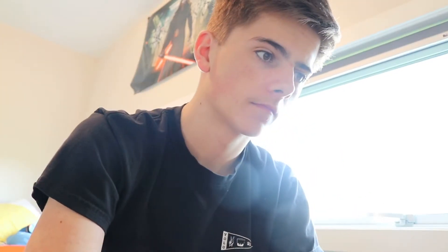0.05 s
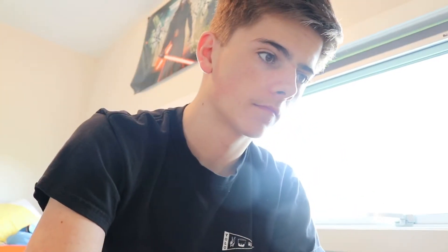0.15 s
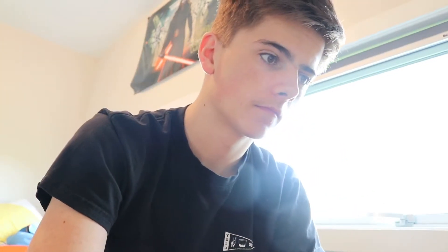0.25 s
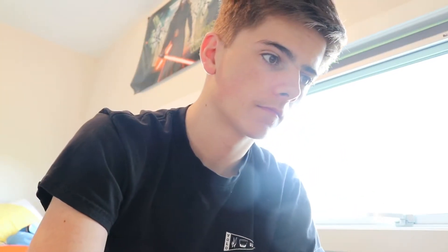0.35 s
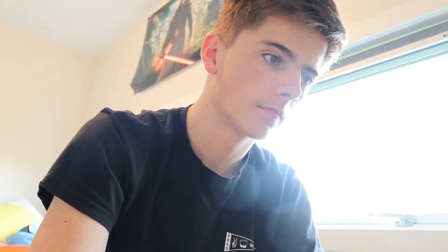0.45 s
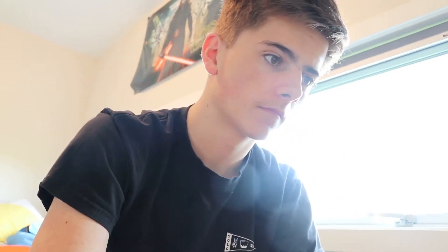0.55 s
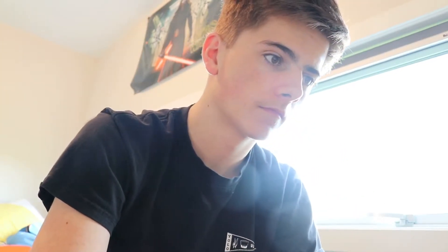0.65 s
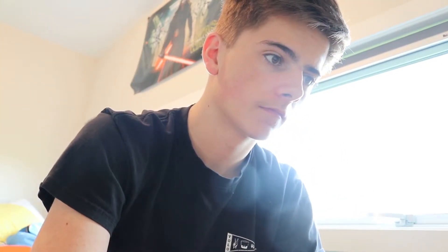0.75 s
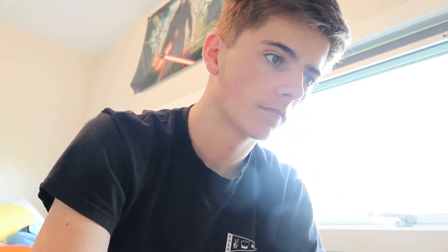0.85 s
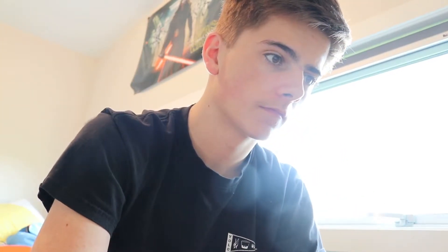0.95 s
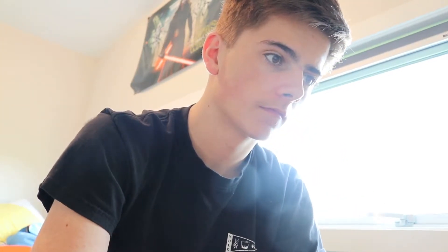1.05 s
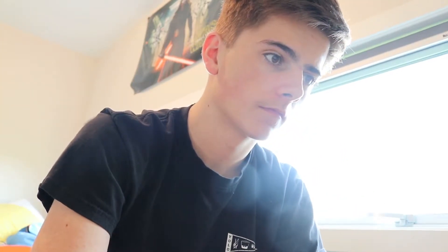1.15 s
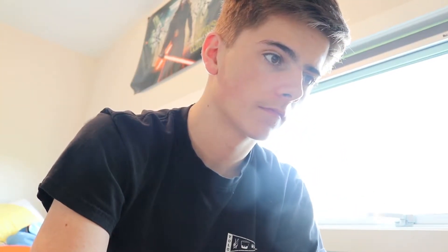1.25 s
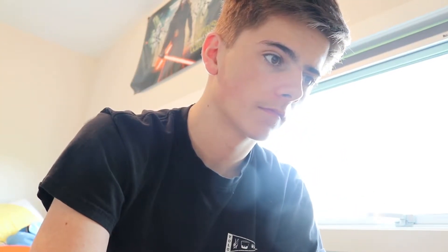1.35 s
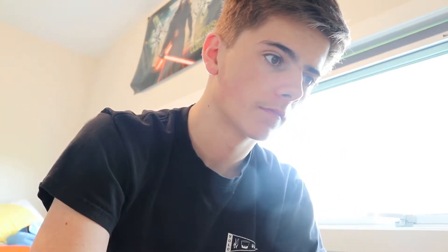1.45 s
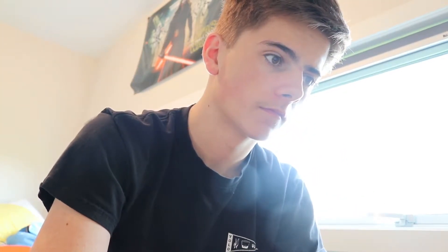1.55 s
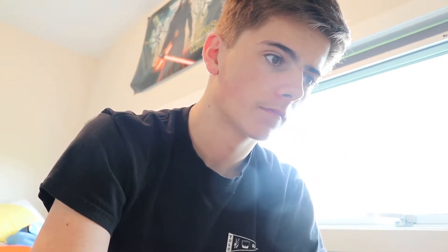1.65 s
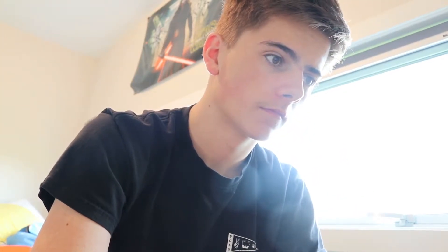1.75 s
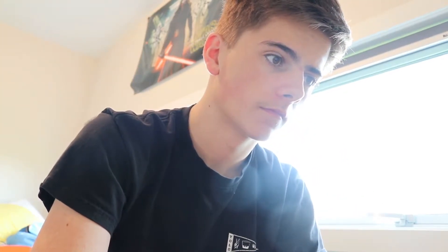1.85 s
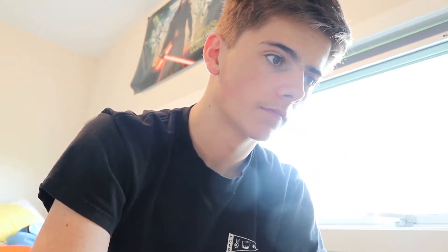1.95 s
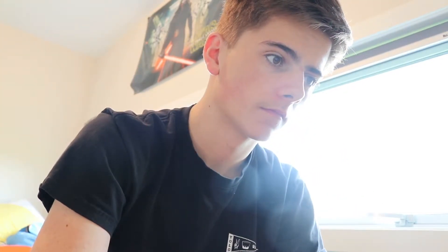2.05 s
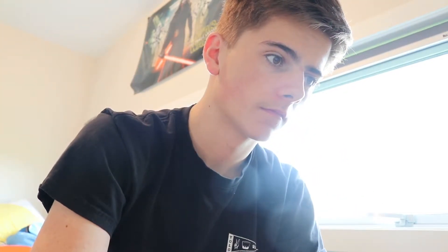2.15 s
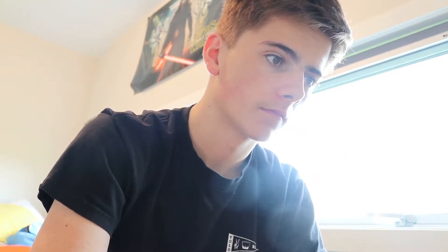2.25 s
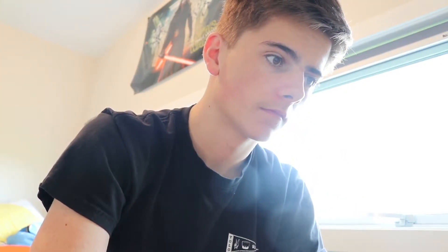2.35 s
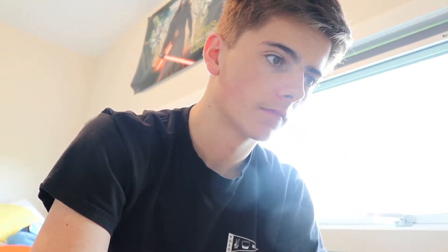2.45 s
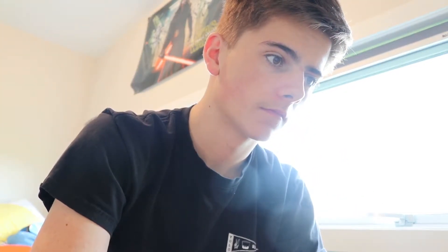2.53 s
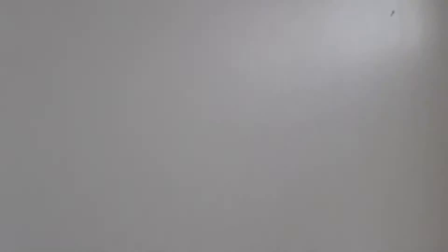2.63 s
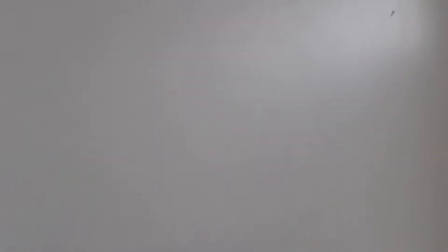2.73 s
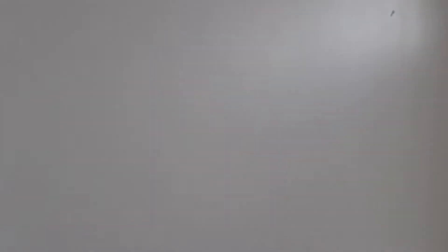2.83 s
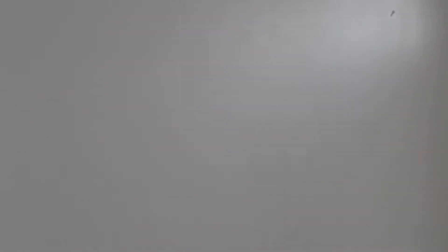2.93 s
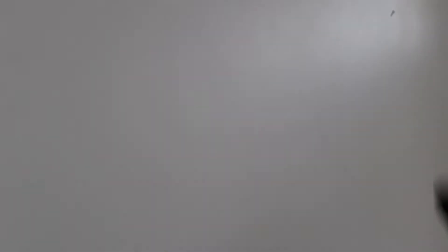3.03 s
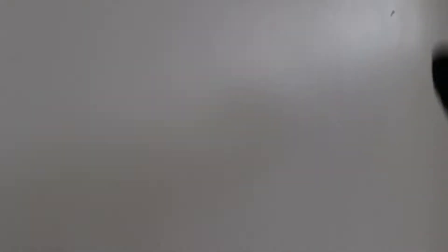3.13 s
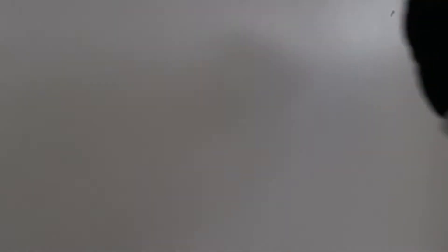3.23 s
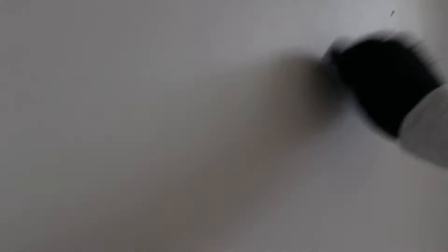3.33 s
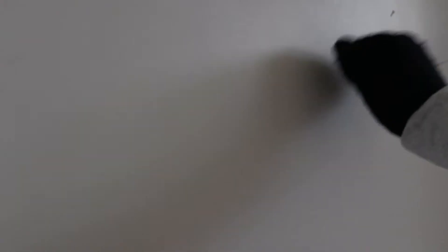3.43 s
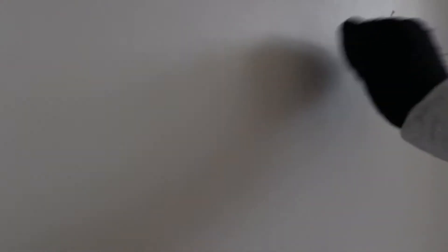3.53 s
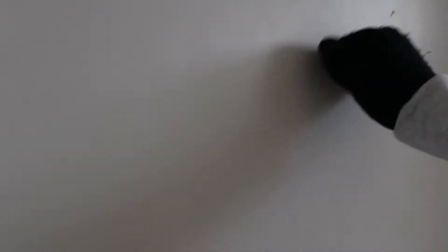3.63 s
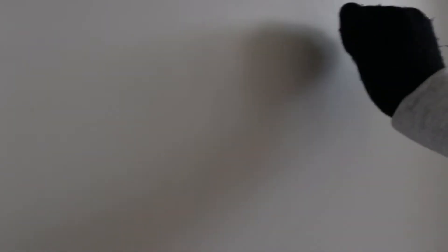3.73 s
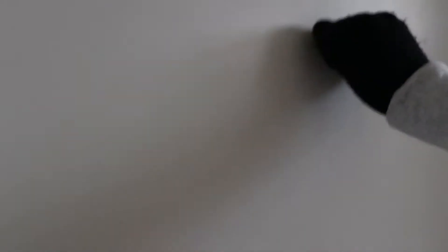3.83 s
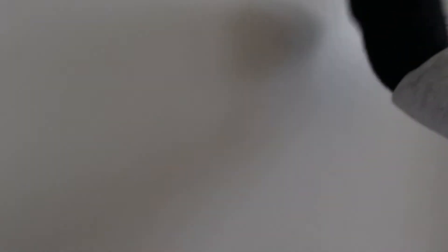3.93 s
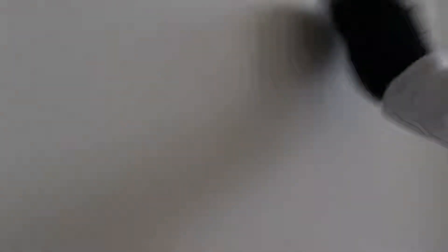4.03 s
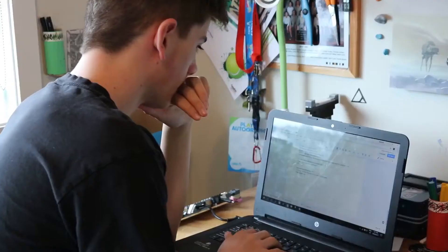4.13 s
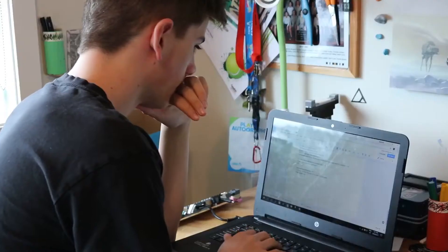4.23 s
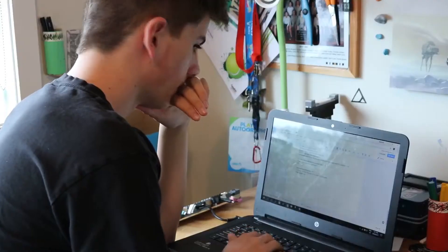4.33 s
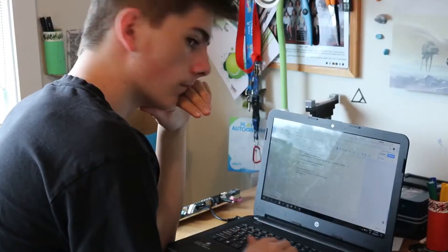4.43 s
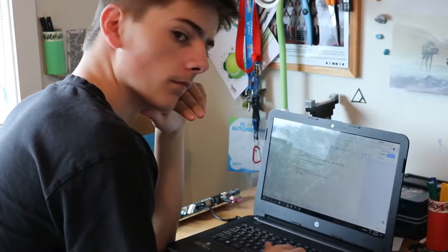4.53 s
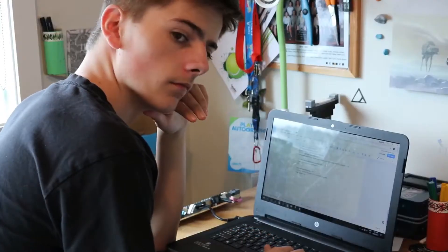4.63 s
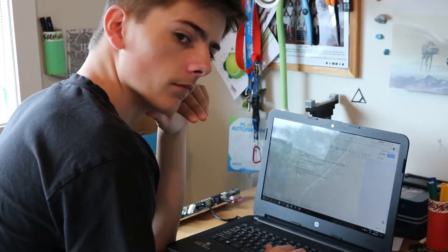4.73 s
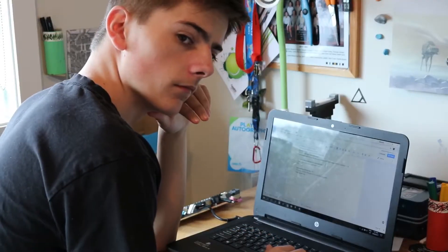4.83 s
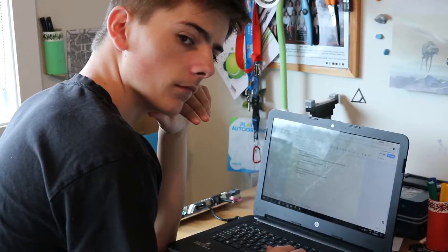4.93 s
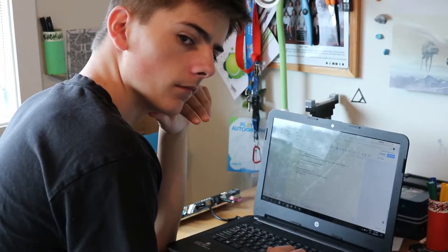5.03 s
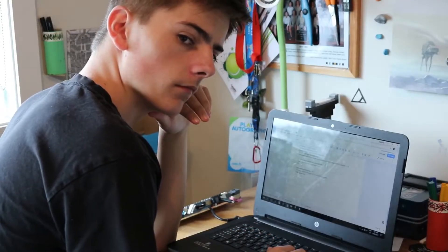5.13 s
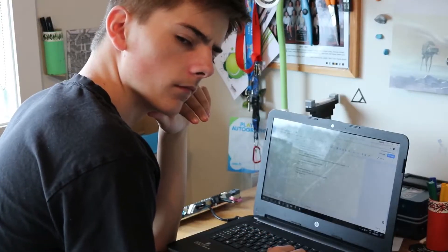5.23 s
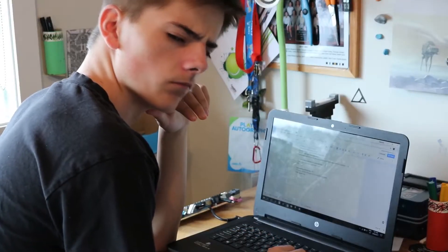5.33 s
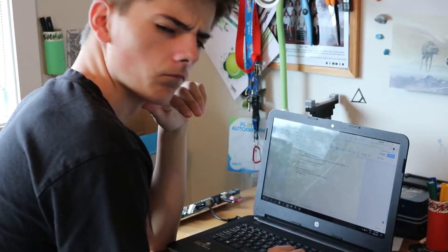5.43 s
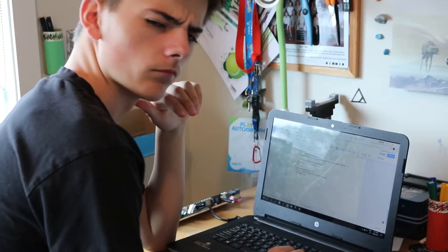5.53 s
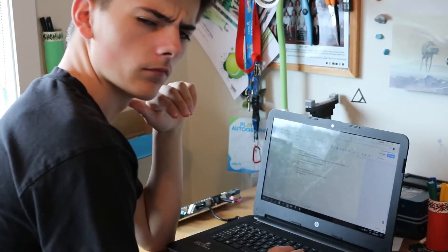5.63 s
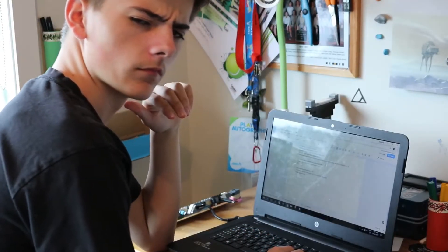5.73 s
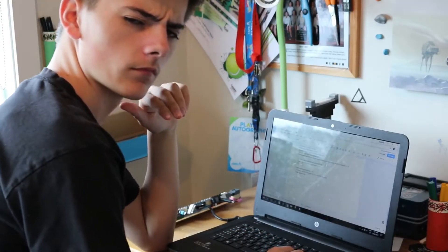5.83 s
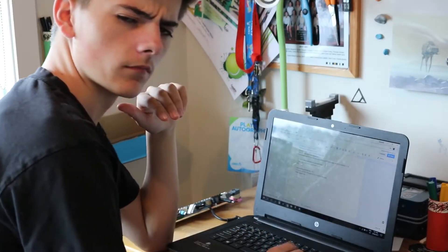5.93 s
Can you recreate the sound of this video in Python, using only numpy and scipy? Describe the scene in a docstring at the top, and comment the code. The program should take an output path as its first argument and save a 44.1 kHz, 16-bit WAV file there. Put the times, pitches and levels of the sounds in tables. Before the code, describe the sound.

Light laptop typing in a quiet room, then four loud, echoing knocks on a hollow wooden door.

```python
"""Fingers type lightly on a laptop, right of a pair of microphones in a small quiet room.
Key caps snap and rattle, and the landing fingers thump the laptop shell and the desk under it.
Four knuckle blows ring a hollow wooden door, which buzzes in its frame and echoes in a hall.
Cloth swishes faintly; then the door's echo cuts off and the room hiss drops a little."""
import sys
import numpy as np
from scipy import signal
from scipy.fft import rfft, irfft
from scipy.io import wavfile
from scipy.ndimage import uniform_filter1d

SR = 44100
rng = np.random.default_rng(int(sys.argv[2]) if len(sys.argv) > 2 else 0)


def dump_mix(stems):
    """Bounce the given channels to the path in sys.argv[1] as a 16-bit WAV at rate SR."""
    frames = np.atleast_2d(stems).T  # one column per channel
    limited = np.clip(frames, -1, 1)  # hard clip at full scale
    pcm = np.round(limited * 32767).astype(np.int16)
    wavfile.write(sys.argv[1], SR, pcm)


N = 263718

# reverb time of the small room around the desk: f/Hz, t60/s
ROOM_DECAY = [(100, 0.2), (500, 0.22), (2000, 0.34), (6000, 0.26), (14000, 0.21)]
# stereo image of the thump and knock echoes, centred in the bass: f/Hz, left-right correlation
ECHO_IMAGE = [(60, .998), (130, .997), (290, .87), (640, .7), (1400, .25), (3000, .05)]
# stereo image of the room tone and the key snap echoes: f/Hz, left-right correlation
AIR_IMAGE = [(60, 0.78), (240, 0.62), (950, 0.74), (3770, 0.0065), (15000, 0.02)]
CUT_S = 4.537  # the door's echo stops and the hiss drops
PUSH_PEAK_S = 0.003  # a blow's force peaks this far into its sound
LEFT_LAG_SAMPLES = 7  # the laptop reaches the left microphone late


def amp(db):
    return 10 ** (np.asarray(db) / 20)


def unit_rms(x):
    return x / np.sqrt(np.mean(x ** 2) + 1e-20)


def curve_at(points, hz):
    """Read a breakpoint curve along a log frequency axis."""
    f, value = np.transpose(points)
    return np.interp(np.log(hz + 1), np.log(f + 1), value)


def add(mix, start_s, sound):
    part = mix[..., round(start_s * SR):][..., :sound.shape[-1]]
    part += sound[..., :part.shape[-1]]


def band_noise(edges_hz, shape):
    white = rng.standard_normal(shape)
    return unit_rms(signal.lfilter(*signal.butter(2, edges_hz, "band", fs=SR), white))


def stereo_noise(spectrogram_db, correlation, size):
    """Noise shaped by a spectrogram (bins x frames), with a left-right correlation per bin."""
    a, b, c, d = rng.standard_normal(spectrogram_db.shape[::-1] + (4,)).T
    correlation = np.clip(correlation, 0, 1)[:, None]
    left = a + 1j * b
    right = correlation * left + np.sqrt(1 - correlation ** 2) * (c + 1j * d)
    spectra = np.array([left, right]) * amp(spectrogram_db)
    return signal.istft(spectra, nperseg=size, noverlap=size * 3 // 4)[1]


def reverb(x, decays, image, predelay_s, size):
    """A dense tail that starts with the first wall; each band dies at its own speed."""
    hz, t = np.fft.rfftfreq(size, 1 / SR), np.arange(4 * SR // size) * size / 4 / SR
    tail = stereo_noise(-60 * t / curve_at(decays, hz)[:, None], curve_at(image, hz), size)
    tail *= np.arange(tail.shape[1]) > predelay_s * SR
    return signal.fftconvolve(x[None], tail / np.linalg.norm(tail[0]), axes=1)[:, :N]


def strike(modes, db, contact_ms, drive, phase_lag, swell_cycles):
    """A rounded push sets off modes that swell and ring out; longer contact sounds duller."""
    hz, mode_db, t60 = np.transpose(modes)[:, :, None]
    t = np.arange(SR // 2) / SR
    swell = 1 - np.exp(-(t + 1 / SR) * hz / swell_cycles)
    decay = amp(mode_db + curve_at(drive, hz) - 60 * t / t60)
    ring = (swell * decay * np.cos(2 * np.pi * hz * t - phase_lag)).sum(0)
    push = (1 + ((t[:300] - PUSH_PEAK_S) * 1000 / contact_ms) ** 2) ** -2
    return amp(db) * signal.oaconvolve(ring, push / push.sum())[:len(t)] / amp(mode_db).sum()


def room_tone():
    """Room air and microphone hiss, lumpy in the bass, softer after the cut."""
    # noise colour before the cut: f/Hz, level/dB
    early_colour = [(15, -38), (25, -5), (48, -2), (70, -6.5), (202, -4.5), (273, -11), (410, -8),
                    (568, -13.5), (1090, -16.5), (1470, -20.5), (2270, -19.5), (3910, -25), (12600, -24),
                    (15200, -34.5), (16500, -51)]
    # noise colour after the cut: f/Hz, level/dB
    late_colour = [(15, -54), (25, -18), (38, -7), (74, -15.5), (108, 7.5), (146, -14), (197, -10.5),
                   (266, -5.5), (304, -13), (378, -9.5), (726, -17.5), (1180, -18), (5720, -25.5),
                   (10000, -22), (14800, -28.5), (16500, -82)]
    # slow gain ride before the cut: t/s, level/dB
    ride = [(0, 2.5), (.8, 0.8), (1.4, 4), (2.0, 1), (2.9, 4.5), (3.3, 4), (3.9, 1), (4.5, 8.5)]
    hz, t = np.fft.rfftfreq(1024, 1 / SR), np.arange(N // 256 + 5) * 256 / SR

    def bed_db(colour):
        db = curve_at(colour, hz)[:, None]
        total_db = 10 * np.log10(np.sum(amp(db) ** 2))
        return db - total_db - 66

    early_db = bed_db(early_colour) + np.interp(t, *np.transpose(ride))
    crossfade = np.clip((t - CUT_S) / 0.05, 0, 1)
    flicker = uniform_filter1d(rng.standard_normal((len(t), len(hz))), 10, axis=0)
    lumps = unit_rms(uniform_filter1d(flicker, 14, axis=1)).T
    depth_db = curve_at([(300, 2.1), (1500, 0.4)], hz)[:, None]
    spectrogram_db = early_db * (1 - crossfade) + bed_db(late_colour) * crossfade + depth_db * lumps
    return stereo_noise(spectrogram_db, curve_at(AIR_IMAGE, hz), size=1024)[:, :N]


def key_snaps():
    """Key caps snap down and back: a short burst of noise, then a weaker rattle of the loose cap."""
    # cap snaps: t/s, level/dB, snap t60/s, rattle re snap/dB
    snaps = [(0.0024, -41.5, 0.023, -36), (0.22, -38, 0.018, -25), (0.2217, -26.5, 0.014, -32),
             (0.2229, -15.5, 0.014, -35), (0.2967, -44, 0.0067, -22), (0.3, -27.5, 0.013, -22),
             (0.3952, -32.5, 0.023, -29), (0.4716, -41, .0084, -33), (0.4831, -35.5, 0.013, -25),
             (0.59, -56, 0.017, -17), (0.6814, -58, .014, -18), (0.8, -56.5, 0.0087, -26),
             (0.852, -55, .0087, -19), (1.1888, -55, 0.019, -11), (1.2878, -52, 0.03, -5),
             (1.2931, -28.5, 0.0098, -21.5), (1.3473, -39.5, 0.012, -20.5), (1.47, -57, .015, -24),
             (1.5332, -48.5, 0.026, -18.5), (1.542, -50, 0.013, -26), (1.643, -53, 0.016, -19),
             (1.6999, -44, 0.007, -33), (1.756, -51, 0.016, -17), (1.946, -58, 0.012, -14),
             (2.175, -44.5, 0.0085, -19), (2.2824, -39, 0.027, -18.5), (2.315, -52.5, .011, -9),
             (2.3685, -40.5, 0.012, -16), (2.4048, -49.5, 0.033, -13), (2.475, -45, 0.051, -13),
             (2.5094, -45.5, 0.02, -16), (2.531, -48, 0.024, -25), (2.5594, -51, .0098, -33),
             (2.6773, -48.5, .033, -4), (2.6858, -39, 0.014, -23), (2.723, -50, 0.021, -15),
             (2.7766, -57, .012, -13), (2.796, -44.5, 0.018, -20), (2.8738, -52.5, 0.012, -18),
             (2.893, -54, 0.024, -26), (2.9287, -46, .02, -9), (2.9392, -40.5, 0.022, -17),
             (3.072, -55.5, 0.016, -11), (3.081, -50, 0.034, -6.5), (3.92, -60.5, 0.017, -20)]
    # colour of a cap's snap: f/Hz, level/dB
    cap_colour = [(350, -29), (600, 4), (1290, 4), (2090, -6.5), (2650, -7.5), (2960, -9.5), (3300, -9.5),
                  (5150, -17), (6250, -9.5), (9090, -5), (10400, -12.5), (13200, -16.5), (16500, -15)]
    low_shelf = [(1800, -12.5), (3300, 0.019)]  # thins the snap's body: f/Hz, level/dB
    pan_db, rattle_t60 = [[-5.5], [5.5]], 0.18
    t, hz = np.arange(4096) / SR, np.fft.rfftfreq(4096, 1 / SR)
    colour = amp(curve_at(cap_colour, hz) + curve_at(low_shelf, hz))
    attack = 1 - np.exp(-(t / 0.0006) ** 2)
    send, direct = np.zeros(N), np.zeros((2, N))
    for start_s, db, t60, rattle_db in snaps:
        grain = unit_rms(irfft(rfft(rng.standard_normal((2, len(t)))) * colour))
        grain[0] = 0.7 * grain[1] + 0.7 * grain[0]  # the far microphone is partly shadowed
        decay = amp(-60 * t / t60) + amp(rattle_db - 60 * t / rattle_t60)
        snap = amp(db) * attack * decay * grain
        add(send, start_s, snap[1])
        add(direct, start_s, snap * amp(pan_db))
    direct[0] = np.roll(direct[0], LEFT_LAG_SAMPLES)
    return direct + amp(-7.5) * reverb(send, ROOM_DECAY, AIR_IMAGE, predelay_s=0.0056, size=256)


def finger_thumps():
    """Each landing finger rings desk top and laptop shell, and the patch of shell under its key."""
    # fingers bottoming out: t/s, level/dB, low drive/dB, mid drive/dB, patch f/Hz, patch level/dB
    landings = [(0.011, -37.5, -13, -22, 664, -2), (0.225, -24.5, -23, -9.5, 847, -5.5),
                (0.232, -33.5, 3, 3.5, 1064, -1), (0.299, -32.5, -7, 0.5, 647, 0),
                (0.396, -26.5, -2, -5, 508, -3.5), (1.194, -44, 6.5, -8, 428, -6),
                (1.293, -31.5, 1, 2, 439, 5.5), (1.303, -38.5, -8, -1, 1037, 8),
                (1.348, -47, 15.5, 7, 450, -1), (1.536, -43.5, 2, -11, 552, 1),
                (2.174, -35.5, -13, -4, 368, 3), (2.283, -27.5, -2, -7, 426, 5.5),
                (2.369, -40.5, 7, -2, 1235, -2), (2.476, -39, 5, 5.5, 480, -2), (2.51, -39, -11, 2, 671, 8),
                (2.54, -44, -25, 11, 460, 4), (2.683, -29, -7, 7, 540, -2), (2.941, -36.5, -5, -10, 418, 5),
                (3.082, -41.5, -4, -0.5, 533, -2)]
    # modes of desk top and laptop shell: f/Hz, level/dB, t60/s
    desk_modes = [(52.2, -3, 0.28), (123, -9, 0.18), (155, 0, 0.18), (230.8, 3, 0.072), (337, -34, 0.45),
                  (448.7, 6, 0.036), (619, -5.5, 0.1), (810, -13, 0.042), (866, -18.5, 0.12),
                  (1004, -12, 0.11), (1514, -17, 0.12), (1854, -14, 0.06)]
    contact_ms, patch_t60 = 0.062, 0.07
    mono = np.zeros(N)
    for start_s, db, low_db, mid_db, patch_hz, patch_db in landings:
        modes = desk_modes + [(patch_hz, patch_db, patch_t60)]
        drive = [(50, low_db), (200, mid_db), (800, 0.014)]  # weight of the hand: f/Hz, level/dB
        phase_lag = np.pi * rng.random((len(modes), 1))  # bending waves reach each part at its own time
        thump = strike(modes, db, contact_ms, drive, phase_lag, swell_cycles=0.65)
        add(mono, start_s - PUSH_PEAK_S, thump)
    direct = np.array([amp(4) * np.roll(mono, LEFT_LAG_SAMPLES), mono])
    return direct + amp(4) * reverb(mono, ROOM_DECAY, ECHO_IMAGE, predelay_s=0.0032, size=512)


def door_knocks():
    """Knuckles crack on the panel; it rings, buzzes in its frame and fills the hall until the cut."""
    # knuckle blows: t/s, level/dB, contact/ms, spot on the panel (-1 middle to 1 edge)
    knocks = [(3.3829, -4, 0.36, 0.023), (3.6101, -5.5, 0.33, -0.78), (3.8218, -3, .43, -1),
              (4.085, -2.5, 0.26, 0.13)]
    # modes of the hollow door: f/Hz, level/dB, t60/s
    door_modes = [(54.6, -20.5, 0.25), (94, -11.5, 0.13), (122, -15.5, 0.218), (169.8, -11.5, 0.47),
                  (220, -2.5, 0.05), (248, -16, 0.072), (302, 2, 0.033), (354.6, -10, .4),
                  (398.4, -1.5, 0.1), (500, -11, 0.11), (516.5, -6, 0.031), (550, -5.5, 0.03),
                  (625, -9.5, 0.12), (692, -2, 0.047), (840, 0.5, 0.017), (891, -9, 0.027), (981, -5, 0.04),
                  (1135, -4.5, 0.038), (1209, -13.5, 0.13), (1421, -18, 0.23), (1527, -27.5, 0.066),
                  (1640, -17, 0.018), (2130, -23.5, .03), (2600, -21.5, .03), (3200, -20, 0.024)]
    # how hard a blow drives the modes: f/Hz, level/dB, change per unit of spot/dB
    spot_drive = [(49.8, 3.5, 0.5), (174.4, 9, 8), (308, 5.5, -7.5), (519.5, 4.5, 0.5), (800, 4.5, 1.5),
                  (1110, 6, 15), (1640, 3.5, 4), (2500, -5.5, -0.5)]
    # reverb time of the hall at the door: f/Hz, t60/s
    hall_decay = [(60, 1), (200, 0.66), (500, 0.68), (1000, 0.69), (1600, 0.99), (2100, 0.4), (3200, 0.35),
                  (5000, 0.64)]
    crack_t60, buzz_t60, wall_delay_s = 0.045, 0.36, 0.003755
    out, t = np.zeros((2, N)), np.arange(SR // 2) / SR
    for start_s, db, contact_ms, spot in knocks:
        drive = [(hz, drive_db + spot * change_db) for hz, drive_db, change_db in spot_drive]
        phase_lag = rng.uniform(-0.3, 1.1, (len(door_modes), 1))  # the panel's parts radiate out of step
        panel = strike(door_modes, db, contact_ms, drive, phase_lag, swell_cycles=0.066)
        wall_bounce = amp(-10.5) * np.pad(panel, (round(wall_delay_s * SR), 0))[:len(t)]
        body = panel + wall_bounce
        crack_decay = amp(-65 - 60 * (t - PUSH_PEAK_S) / crack_t60) * (t > PUSH_PEAK_S)
        crack = crack_decay * band_noise([4200, 10500], len(t)) / contact_ms  # hard contact cracks more
        buzz = amp(db - 49 - 60 * t / buzz_t60) * band_noise([1500, 3100], (2, len(t)))
        direct = np.array([np.roll(body, LEFT_LAG_SAMPLES // 2), body]) + crack
        send = body + amp(-11.5) * crack  # each spot excites the hall anew
        hall = amp(-2) * reverb(send, hall_decay, ECHO_IMAGE, predelay_s=0.007, size=1024)
        add(out, start_s, buzz)
        add(out, start_s - PUSH_PEAK_S, direct)
        add(out, start_s - PUSH_PEAK_S, hall)
    gate = np.clip((CUT_S - np.arange(N) / SR) / 0.0031, 0, 1)
    return out * gate


def cloth_swishes():
    """Cloth rubs as someone moves: bands of fine friction noise that swell and fade."""
    # swishes: middle t/s, half length/s, level/dB, centre f/Hz
    swishes = [(3.5, 0.17, -67.5, 8200), (4.31, 0.091, -64.5, 6200), (4.512, 0.074, -65, 8100)]
    hz, t = np.fft.rfftfreq(256, 1 / SR), np.arange(N // 64 + 5) * 64 / SR
    power = 1e-18
    for middle_s, half_s, db, centre_hz in swishes:
        band = amp(-60 * np.log2((hz[:, None] + 1) / centre_hz) ** 2)
        swell = amp(db - 10 * ((t - middle_s) / half_s) ** 2)
        power = power + (band / np.linalg.norm(band) * swell) ** 2
    return stereo_noise(10 * np.log10(power), correlation=np.full_like(hz, 0.45), size=256)[:, :N]


def scene():
    return key_snaps() + finger_thumps() + door_knocks() + room_tone() + cloth_swishes()


def record(dry):
    """The microphones lose the deepest bass, the input rounds off peaks, a low-pass trims the top."""
    low_cut_hz, ceiling, high_cut_hz = 41, 0.42, 16000
    thinned = signal.sosfilt(signal.butter(3, low_cut_hz, "high", fs=SR, output="sos"), dry)
    rounded = ceiling * np.tanh(thinned / ceiling)
    low_pass = signal.firwin(101, high_cut_hz, window=("kaiser", 9), fs=SR)
    return signal.oaconvolve(rounded, low_pass[None], "same")


dry = scene()
out = record(dry)
dump_mix(out)
```